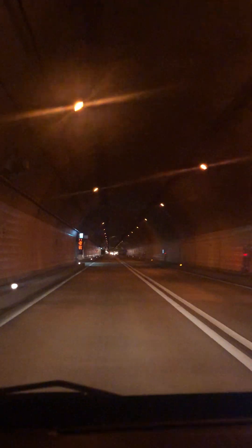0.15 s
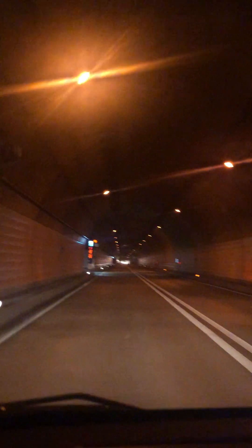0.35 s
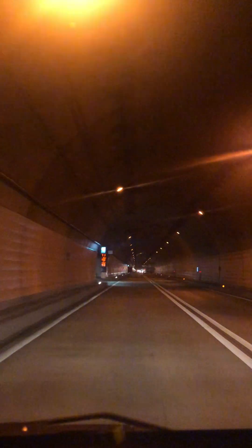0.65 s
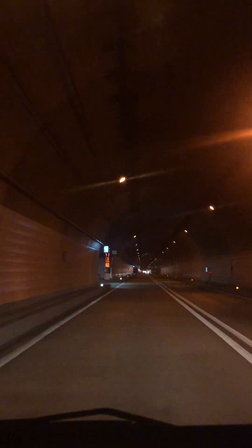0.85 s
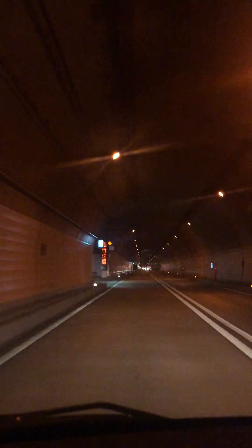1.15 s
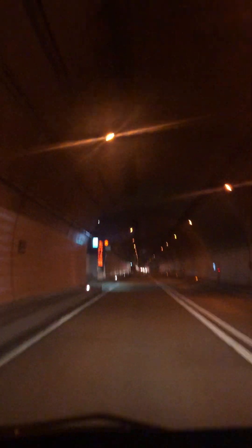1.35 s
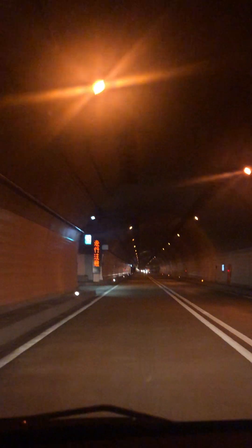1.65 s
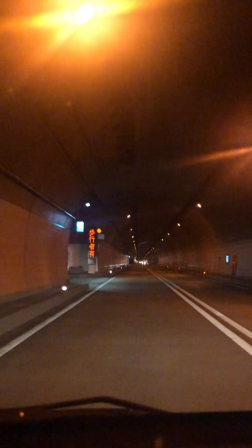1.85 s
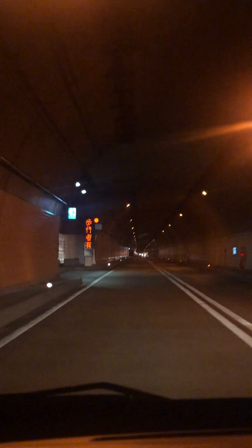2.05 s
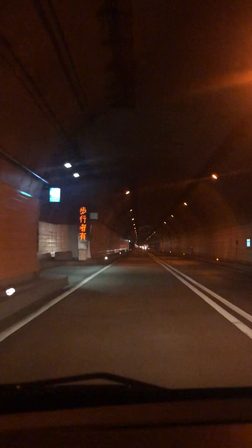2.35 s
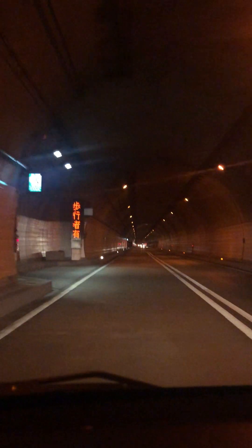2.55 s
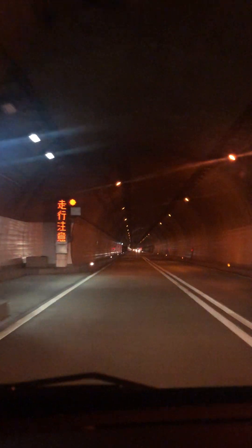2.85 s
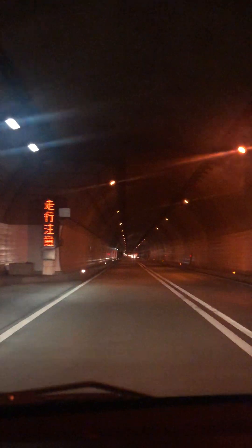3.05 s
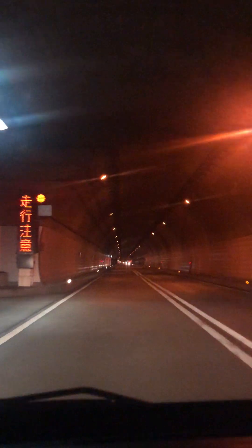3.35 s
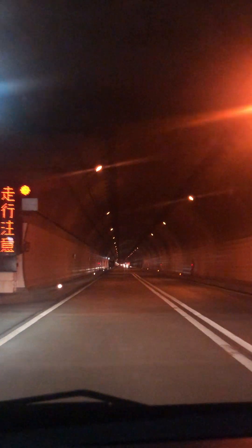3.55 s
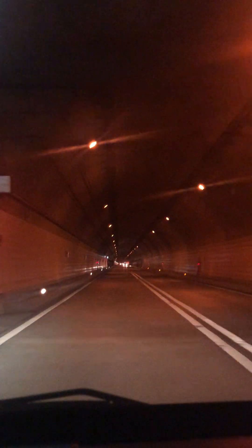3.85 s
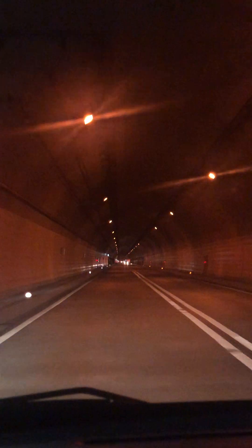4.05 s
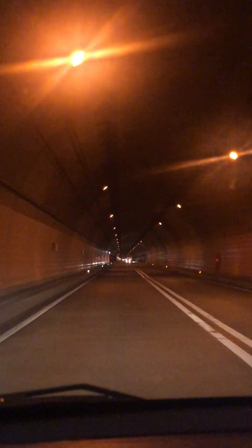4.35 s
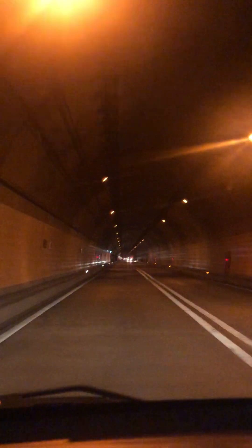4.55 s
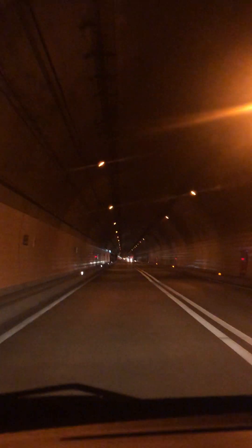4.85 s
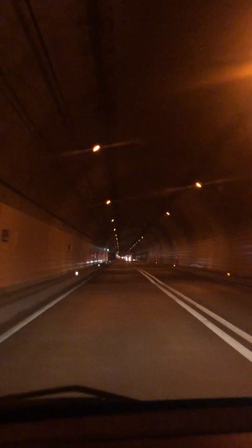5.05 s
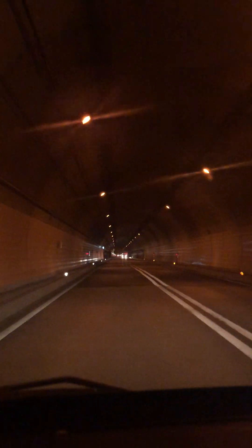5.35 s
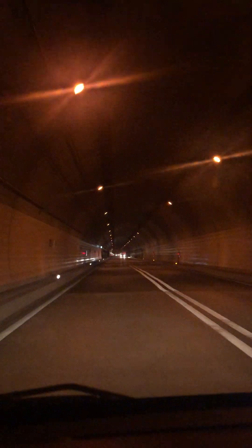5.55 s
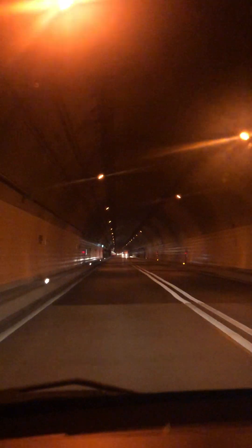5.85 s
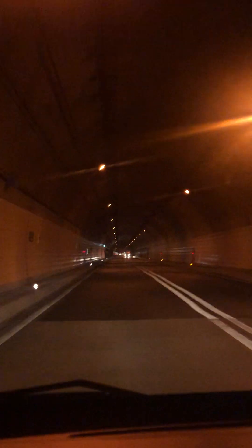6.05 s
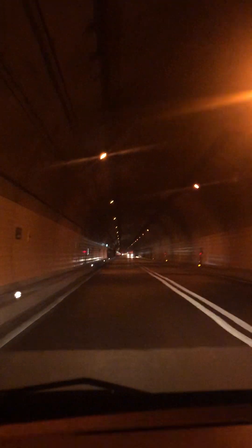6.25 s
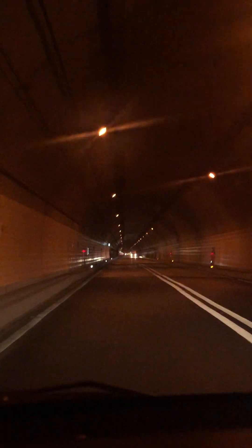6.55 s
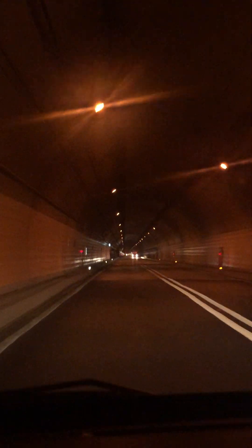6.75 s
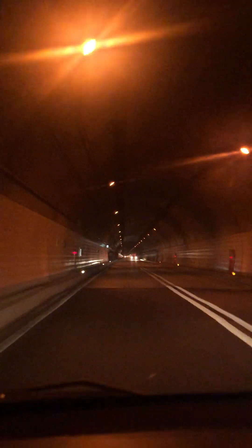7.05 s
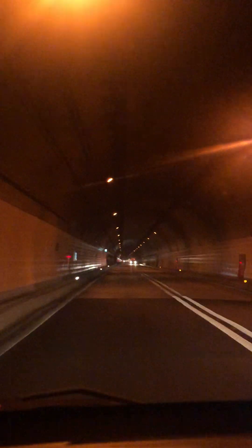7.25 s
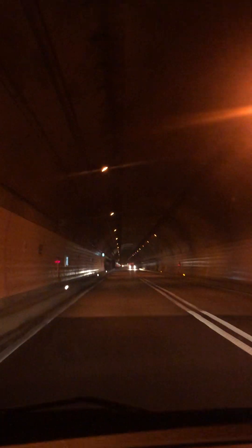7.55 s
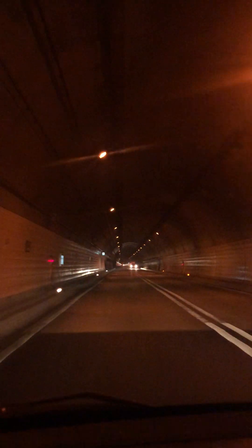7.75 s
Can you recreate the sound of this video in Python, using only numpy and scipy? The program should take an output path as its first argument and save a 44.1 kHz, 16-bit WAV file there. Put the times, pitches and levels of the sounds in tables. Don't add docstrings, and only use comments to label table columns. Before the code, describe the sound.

Low cabin rumble and soft tyre roar in a tunnel, a hard double thump midway, and a burst of jolts and plastic rattle late on.

```python
import sys
import numpy as np
from scipy import signal
from scipy.fft import rfft, irfft, next_fast_len
from scipy.io import wavfile
from scipy.ndimage import uniform_filter1d

SR = 44100
rng = np.random.default_rng(int(sys.argv[2]) if len(sys.argv) > 2 else 0)


def to_wav(s):
    ch = np.atleast_2d(s).T
    pcm = np.round(np.clip(ch, -1, 1) * 32767)
    wavfile.write(sys.argv[1], SR, pcm.astype(np.int16))


def ratio(d):
    e = np.asarray(d, float) / 20
    return 10 ** e


N = 348831
TIME = np.arange(N) / SR
SLOW_TIME = TIME[::64]

# time in seconds, coarseness in dB.
ROAD_COARSENESS = [
    (0.0, 1.6),
    (0.72, 1.7),
    (1.08, 0.56),
    (2.4, 0.6),
    (3.83, 1),
    (5.04, 0.06),
    (6.76, 0.85),
    (6.94, 0.9),
    (7.91, -0.9),
]
# pitch in Hz, width in Hz, level in dB.
BODY_MODES = [(26, 16, -16), (40.7, 9.8, 0.5), (52, 21, -3), (60, 13, -2.5)]
# pitch in Hz, width in Hz, level in dB.
CABIN_MODES = [(72.1, 24, 1), (93, 12.5, -2), (108.6, 24, -5.5), (124.4, 11.3, -2.5)]
# pitch in Hz, width in Hz, level in dB.
FLOOR_MODES = [(133.6, 29, -4), (155.2, 20.6, 1.5), (175.4, 23, 0.5), (186.5, 24, 0), (205, 18, -3),
               (228.3, 41, -5.5)]
# pitch in Hz, width in Hz, level in dB.
TYRE_AIR_MODES = [(245, 28, -6), (267.2, 30, 1), (292.7, 35, -4.5), (307.2, 17.5, -5), (331.2, 26.4, -3.5)]
# frequency in Hz, level in dB per Hz.
ROAR_COLOUR = [(210, -33), (350, -1), (430, -3), (530, -8), (620, -7.5), (950, -8), (1240, -13.5),
               (1910, -17), (2540, -23.5), (3490, -25), (5500, -34.5), (8000, -41.5), (11000, -47.5),
               (15800, -53)]
# pitch in Hz, width in Hz, boost in dB.
ROAR_PEAKS = [(379, 20, 3), (494.6, 30, 5.5), (707, 45, 2.5), (959, 90, 3), (1325, 20, 6), (1570, 92, 3.5),
              (1863, 124, 5), (2232, 62, 5), (2450, 90, 2.5), (3770, 79, 4.5), (4430, 130, 2),
              (4770, 83, 5)]
# pitch in Hz, level in dB.
WHINE_TONES = [(1492, -76), (2818, -76.5), (3376, -72)]
# frequency in Hz, level in dB per Hz.
TRIM_COLOUR = [(1000, -5), (2500, -3.5), (5700, -5.5), (10000, -12.5), (15500, -18)]
# start in seconds, peak in dB, pitch in Hz.
TYRE_THUMPS = [
    (0.475, -18, 266),
    (1.452, -24, 260),
    (4.418, -16, 296.6),
]
# start in seconds, peak in dB, pitch in Hz.
TRIM_TINKS = [
    (4.447, -44, 1500),
    (6.918, -44, 2400),
    (7.05, -47, 2834),
    (7.073, -44, 4770),
    (7.1, -44, 3685),
    (7.261, -39.5, 2902),
    (7.293, -44, 2900),
    (7.302, -48, 2870),
    (7.351, -50, 2900),
]
# peak time in seconds, swing in dB, pitch in Hz, length in seconds.
BODY_BUMPS = [(0.2, -31, 45.6, 0.073), (0.46, -29.5, 40.7, 0.082), (0.901, -26, 42, 0.047),
              (1.0, -27.5, 44, 0.056), (1.33, -29, 52.8, .06), (1.551, -28, 52, 0.036),
              (1.95, -30.5, 56, .05), (2.09, -29, 52, 0.052), (2.29, -28, 52, .05),
              (2.433, -27.5, 48.2, .06), (2.655, -27.5, 44, 0.07), (3.321, -27.5, 60.7, .07),
              (3.499, -29.5, 62.9, .08), (3.709, -28.5, 60, 0.054), (4.138, -26, 58, .05),
              (4.433, -27.5, 50.1, 0.053), (4.555, -20.5, 43.5, 0.046), (4.62, -19, 42.5, 0.046),
              (4.711, -24, 42.3, 0.057), (5.059, -29.5, 51, .08), (6.837, -23, 61, 0.051),
              (6.919, -21, 52, 0.039), (7.01, -21, 43, .04), (7.094, -15.5, 43.95, .05),
              (7.21, -18.5, 50, 0.038), (7.368, -20.5, 46.6, 0.036), (7.45, -21.5, 50.8, .04),
              (7.649, -24, 54.07, 0.071), (7.799, -22.5, 49.1, 0.074), (7.891, -20, 49.6, 0.039)]
# peak time in seconds, level in dB.
CABIN_BLOWS = [(0.36, -30.5), (0.57, -27), (0.95, -27), (1.15, -29), (1.55, -31), (1.68, -31),
               (1.86, -28.5), (1.98, -27), (2.39, -27), (2.75, -29.5), (3.09, -27), (3.36, -28),
               (3.47, -29), (3.62, -28), (3.84, -25.5), (4.04, -28), (4.17, -27), (4.26, -28.5),
               (4.44, -25.5), (4.6, -27.5), (4.93, -27.5), (5.34, -26.5), (5.61, -29), (6.76, -25),
               (6.85, -22.5), (6.99, -24), (7.13, -22.5), (7.26, -21), (7.43, -22), (7.73, -24.5)]
# peak time in seconds, level in dB.
FLOOR_DRUMS = [(0.16, -31), (0.31, -34.5), (0.44, -35), (0.75, -33), (1.05, -35), (1.48, -31.5),
               (1.67, -33), (1.95, -30.5), (2.57, -33), (2.71, -31.5), (2.96, -35.5), (3.2, -31.5),
               (3.57, -31.5), (3.8, -35.5), (4.02, -35.5), (4.43, -30), (4.56, -35), (4.93, -33),
               (5.69, -32.5), (6.0, -31), (6.22, -32), (6.42, -33.5), (6.75, -28), (6.98, -33.5),
               (7.15, -29.5), (7.29, -31), (7.39, -31), (7.7, -33)]
# peak time in seconds, level in dB.
TYRE_SLAPS = [(0.18, -34.5), (0.48, -36), (0.66, -32), (0.82, -34), (0.97, -33), (1.24, -37), (1.46, -33.5),
              (1.64, -35), (1.94, -32), (2.53, -33), (2.66, -36), (2.96, -34), (3.3, -34), (3.45, -33),
              (3.64, -34.5), (3.85, -34), (4.03, -34), (4.28, -33.5), (4.43, -28.5), (4.55, -37),
              (4.84, -36), (4.95, -35), (5.19, -35.5), (5.52, -34), (5.94, -36), (6.21, -36), (6.4, -36),
              (6.71, -33)]
# peak time in seconds, level in dB, length in seconds.
TRIM_FITS = [(0.0, -67, .1), (1.375, -64, .1), (1.89, -67.5, .09), (4.455, -62.5, .06), (4.558, -69, 0.22),
             (6.767, -63.5, 0.051), (6.93, -61, .06), (7.067, -55.5, 0.032), (7.1, -55, 0.032),
             (7.14, -61, .03), (7.273, -64, .1), (7.47, -68, .05), (7.52, -70, .04), (7.85, -69, 0.28)]
# start in seconds, peak in dB, low part in dB.
SMOOTH_ROAD_TICKS = [(0.807, -51, 2), (1.0614, -53, 3), (1.1786, -52, 1), (1.1994, -53, 3),
                     (1.8524, -53, 0), (3.0294, -55.5, 5), (3.3336, -52.5, 0), (3.4794, -54, 4),
                     (3.7894, -54, 0), (3.872, -56, 2.5), (4.0698, -53, 2), (4.1685, -57, 0),
                     (4.4247, -50, -3), (4.4344, -52, -1), (4.443, -38, -2.5), (4.4467, -40.5, 8),
                     (4.4677, -49, -6), (4.4756, -42, -8), (4.5056, -38, -10.5), (5.1414, -56, 1),
                     (5.5774, -56, 2), (5.693, -53, -2)]
# start in seconds, peak in dB, low part in dB.
BROKEN_ROAD_TICKS = [(6.73, -54, 3), (6.7564, -48, -5), (6.7689, -47, -4), (6.7894, -50, 2.5),
                     (6.8632, -51, 2), (6.8822, -41, -2.5), (6.9162, -42.5, 5), (6.9378, -46, -3),
                     (6.9514, -47, -2.5), (7.015, -45, -5), (7.0362, -48, -1), (7.0495, -41, 3),
                     (7.072, -35, 2), (7.0993, -39, -4), (7.1173, -47, -5), (7.1474, -38.5, -9),
                     (7.2593, -39, -3), (7.2917, -50, 9), (7.299, -46, 7.5), (7.3351, -44, -4),
                     (7.3514, -52, 1), (7.397, -42, -4), (7.4629, -41, -5.5), (7.5022, -54, -2),
                     (7.5135, -44, -3), (7.5382, -55, -3), (7.687, -51, 7.5), (7.7726, -51, -2),
                     (7.825, -52, -3), (7.8844, -50, -0.5)]

HISS_FOLLOWS, BODY_FOLLOWS = 0.43, 1
BODY_BED_DB, CABIN_BED_DB, FLOOR_BED_DB, TYRE_AIR_BED_DB, TRIM_BED_DB = -35, -32, -37.5, -38.5, -70.5
BLOW_S, DRUM_S, SLAP_S = 0.063, 0.056, 0.05


def unit(x):
    return x / np.sqrt(np.mean(x ** 2))


def shape(x, gain_at):
    size = next_fast_len(N)
    hz = np.arange(1, size // 2 + 2) * SR / size
    return irfft(rfft(x, size) * gain_at(hz), size)[:N]


def slope(points):
    hz, db = np.transpose(points)
    return lambda f: ratio(np.interp(np.log(f), np.log(hz), db))


def bell(f, hz, width):
    return 1 / (1 + ((f - hz * hz / f) / width) ** 2)


def walk(rate):
    k = int(SR / rate)
    held = np.repeat(rng.standard_normal(N // k + 1), k)
    return unit(uniform_filter1d(uniform_filter1d(held, k), k)[:N])


def smooth(control):
    return np.interp(TIME, SLOW_TIME, control)


def add(out, start_s, x):
    i = int(start_s * SR)
    out[i:i + len(x)] += x[:N - i]


def swells(events):
    peak_s, db, length = np.transpose(events)[:, :, None]
    late = (SLOW_TIME - peak_s) / np.maximum(length, 0.01)
    late = np.where(late < 0, late / 0.73, late)
    return ratio(2 * db) * np.exp(-late ** 2)


def struck(bed_db, events, patchy_db, rate):
    bed = ratio(2 * (bed_db + patchy_db * walk(rate)))
    return 10 * np.log10(bed + smooth(swells(events).sum(axis=0)))


def shaken(modes, db, even_s):
    def response(f):
        return np.sqrt(sum(ratio(2 * gain) * bell(f, hz, width) ** 2 for hz, width, gain in modes))

    x = shape(rng.standard_normal(N), response)
    k = int(even_s * SR)
    power = uniform_filter1d(uniform_filter1d(x ** 2, k), k)
    return ratio(db) * x / np.sqrt(power)


def whine():
    out = np.zeros(N)
    for hz, db in WHINE_TONES:
        level = ratio(db + 4.2 * walk(4.6)) * np.sqrt(2)
        pitch = hz + 7.6 * walk(9)
        out += level * np.sin(2 * np.pi * np.cumsum(pitch) / SR)
    return out


def chatter(rate, spread_db, top_db, ring_s):
    chance = rng.random((2, N))
    size_db = np.minimum(-spread_db * np.log(1 - chance[1]), top_db)
    contacts = (chance[0] < rate / SR) * ratio(size_db)
    puffs = signal.lfilter([1], [1, -np.exp(-1 / (ring_s * SR))], contacts)
    return unit(puffs * rng.standard_normal(N))


def trim_rattle():
    shake_db = struck(TRIM_BED_DB, TRIM_FITS, 0.3, 3)
    power = np.maximum(ratio(2 * shake_db) - ratio(2 * -71), 0)
    crackle = unit(shape(chatter(1500, 2.9, 11, 0.0024), slope(TRIM_COLOUR)))
    faint_ticks = unit(shape(chatter(150, 3.0, 8, 0.003), lambda f: bell(f, 12500, 7000)))
    return ratio(4.5) * np.sqrt(power) * crackle + ratio(-84 + 1.5 * walk(4.4)) * faint_ticks


def trim_ticks():
    out, t = np.zeros(N), TIME[:2048]
    f = np.arange(1, 1026) * SR / 2048
    for start_s, db, low_db in SMOOTH_ROAD_TICKS + BROKEN_ROAD_TICKS:
        noise = rfft(rng.standard_normal(2048))
        env = (1 - np.exp(-t / 0.00091)) * ratio(db - 60 * t / 0.016)
        dull = unit(irfft(noise * bell(f, 2300, 2500)))
        middle = unit(irfft(noise * bell(f, 6500, 5100)))
        bright = unit(irfft(noise * bell(f, 12000, 9700)))
        bright_db = -11.5 - 0.25 * low_db
        add(out, start_s, env * (ratio(low_db + 1.0) * dull + ratio(-10.5) * middle + ratio(bright_db) * bright))
    return out


def rings(events, rise_s, t60_s):
    out, t = np.zeros(N), TIME[:int(0.2 * SR)]
    env = (1 - np.exp(-t / rise_s)) * ratio(-60 * t / t60_s)
    env = env / env.max()
    for start_s, db, hz in events:
        add(out, start_s, ratio(db) * env * np.sin(2 * np.pi * hz * t))
    return out


def seam_knocks():
    thumps = ratio(-3.0) * rings(TYRE_THUMPS, 0.007, 0.049)
    return thumps + rings(TRIM_TINKS, 0.00079, 0.032) + trim_ticks()


def tyre_roar(road_db):
    out = np.zeros(N)
    for hz in 400 * 2 ** np.arange(7):
        octave = lambda f: np.cos(np.pi / 2 * np.clip(np.log2(f / hz), -1, 1))
        band = shape(rng.standard_normal(N), octave)
        surface_db = road_db if hz < 1000 else HISS_FOLLOWS * road_db
        out += ratio(surface_db - surface_db.mean() + 0.38 * walk(8.3)) * band
    peaks = lambda f: ratio(sum(db * bell(f, hz, width) for hz, width, db in ROAR_PEAKS))
    return ratio(-41) * unit(shape(out, lambda f: slope(ROAR_COLOUR)(f) * peaks(f)))


def tyre_air(bed_db):
    slaps = [(s, db - 1.9, SLAP_S) for s, db in TYRE_SLAPS]
    return shaken(TYRE_AIR_MODES, struck(TYRE_AIR_BED_DB + bed_db, slaps, 2.06, 14), 0.061)


def floor_drumming(bed_db):
    drums = [(s, db - 1.6, DRUM_S) for s, db in FLOOR_DRUMS]
    return shaken(FLOOR_MODES, struck(FLOOR_BED_DB + bed_db, drums, 1.48, 13), 0.07)


def cabin_boom(bed_db):
    blows = [(s, db, BLOW_S) for s, db in CABIN_BLOWS]
    db = struck(CABIN_BED_DB + bed_db, blows, 1.54, 12)
    extra_db = 0.38 * (db + 29)
    lowest = shaken(CABIN_MODES[:1], db - 4.0 + 0.27 * extra_db, 0.1)
    return lowest + shaken(CABIN_MODES[1:], db - 2.5 - extra_db, 0.091)


def swing_pitch():
    power = swells([(s, db, 1.492 * length) for s, db, _, length in BODY_BUMPS])
    bump_hz = np.array(BODY_BUMPS)[:, 2]
    bed = ratio(2 * -42)
    return smooth((bump_hz @ power + bed * 52) / (power.sum(axis=0) + bed))


def body_bounce(bed_db):
    bumps = [(s, db, length) for s, db, _, length in BODY_BUMPS]
    db = struck(BODY_BED_DB + bed_db, bumps, 2.5, 12)
    share = 0.92 / (1 + np.exp((-26 - db) / 4.0))
    swing = np.sqrt(2 * share) * ratio(db) * np.sin(2 * np.pi * np.cumsum(swing_pitch()) / SR)
    return swing + np.sqrt(1 - share) * shaken(BODY_MODES, db, 0.048)


def scene():
    road_s, coarse_db = np.transpose(ROAD_COARSENESS)
    road_db = np.interp(TIME, road_s, coarse_db)
    bed_db = BODY_FOLLOWS * road_db
    small_parts = whine() + trim_rattle() + seam_knocks()
    tyres = tyre_roar(road_db) + tyre_air(bed_db)
    body = floor_drumming(bed_db) + cabin_boom(bed_db) + body_bounce(bed_db)
    return (small_parts + tyres + body)[None]


def top_cut(x):
    return signal.sosfilt(signal.butter(12, 15740, fs=SR, output="sos"), x)


def record(dry):
    x = signal.sosfilt(signal.butter(4, 33, "high", fs=SR, output="sos"), dry)
    x = signal.sosfilt(signal.ellip(8, 0.2, 70, 15780, fs=SR, output="sos"), x)
    x = x * np.sin(np.pi / 2 * np.minimum((TIME[-1] - TIME) / 0.008, 1))
    return top_cut(x)


dry = scene()
out = record(dry)
to_wav(out)
```